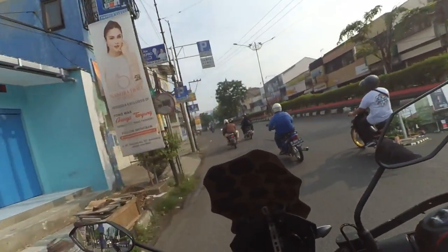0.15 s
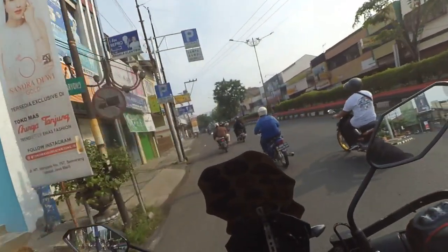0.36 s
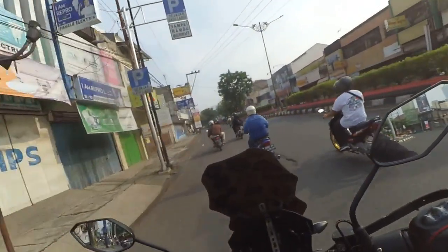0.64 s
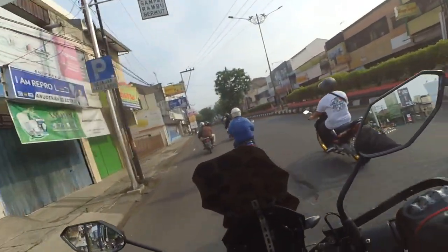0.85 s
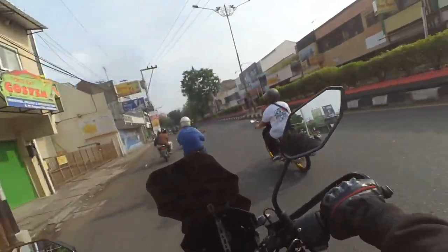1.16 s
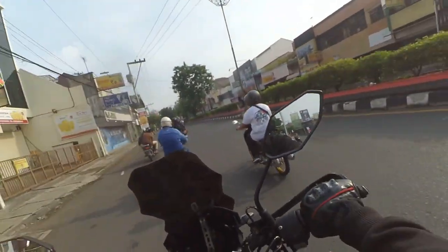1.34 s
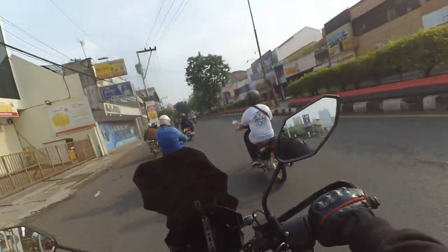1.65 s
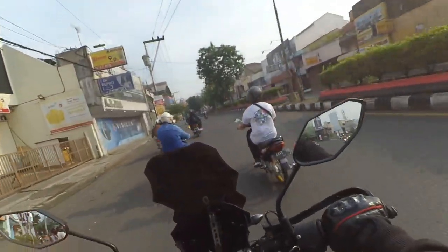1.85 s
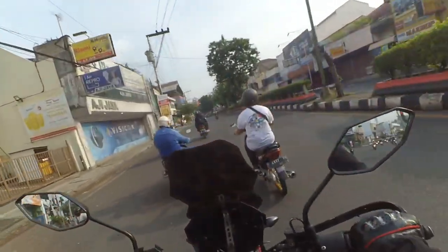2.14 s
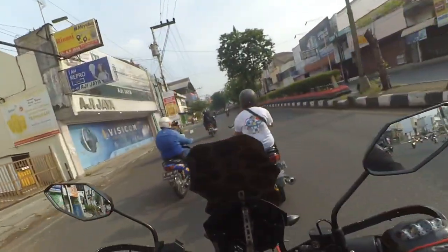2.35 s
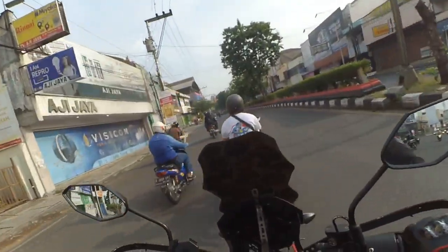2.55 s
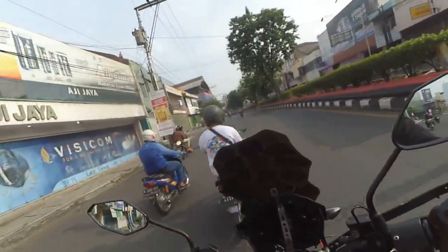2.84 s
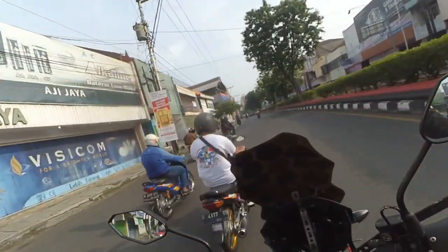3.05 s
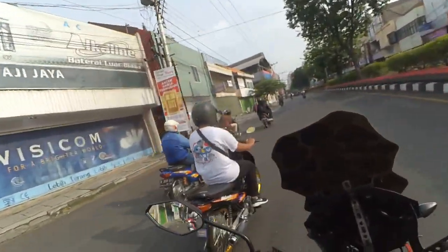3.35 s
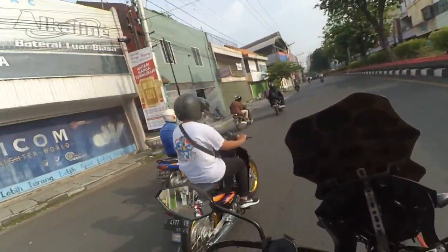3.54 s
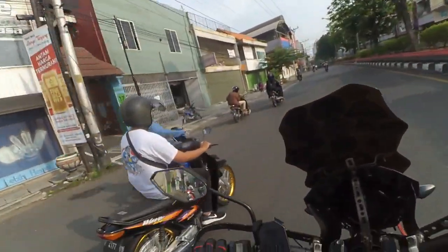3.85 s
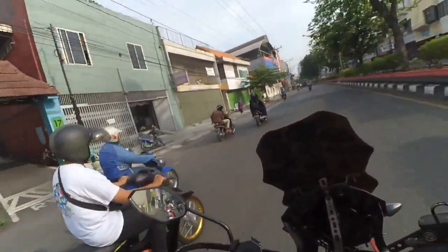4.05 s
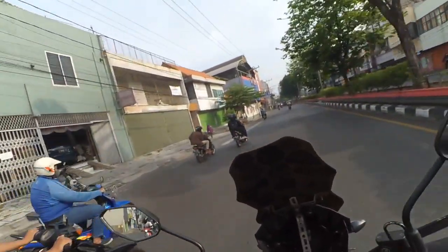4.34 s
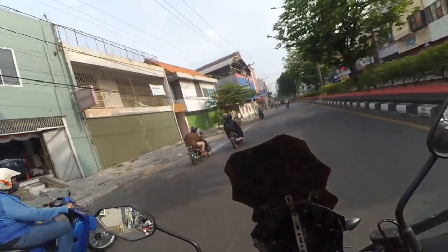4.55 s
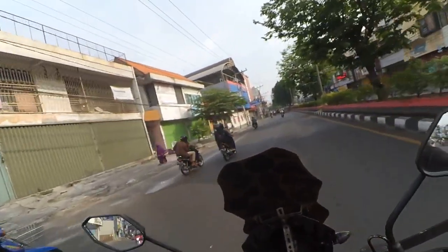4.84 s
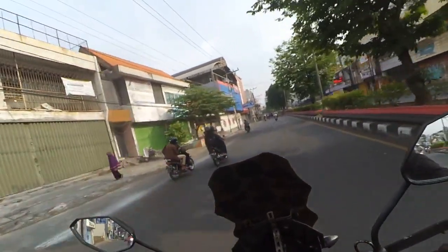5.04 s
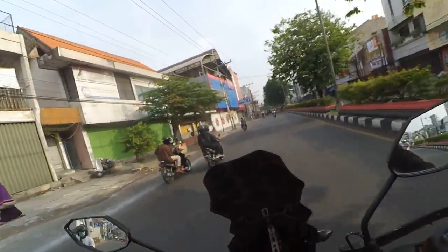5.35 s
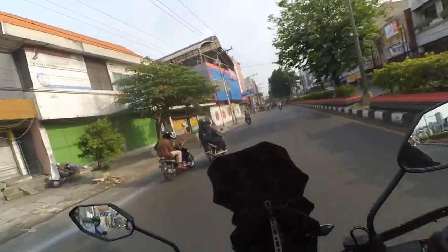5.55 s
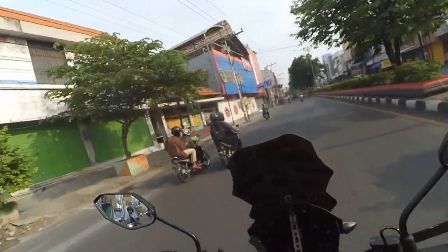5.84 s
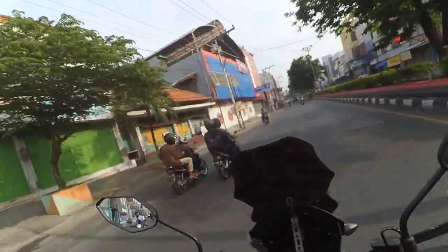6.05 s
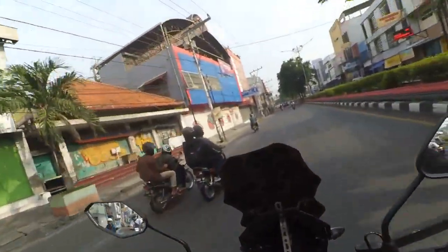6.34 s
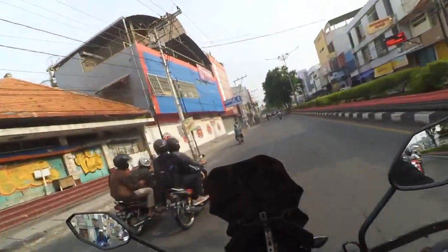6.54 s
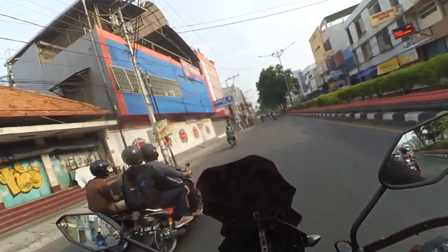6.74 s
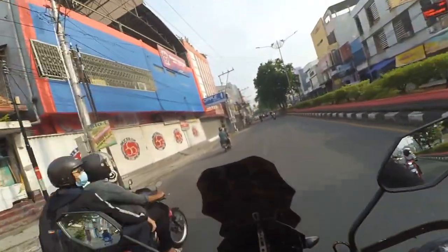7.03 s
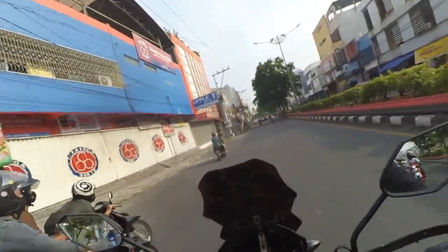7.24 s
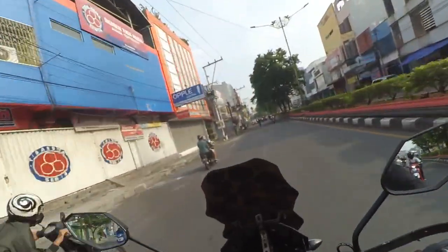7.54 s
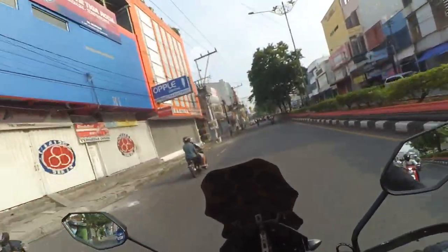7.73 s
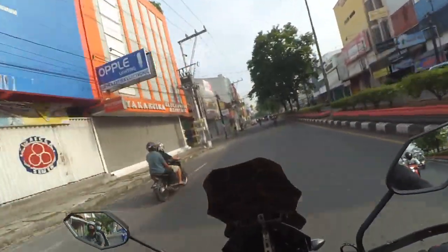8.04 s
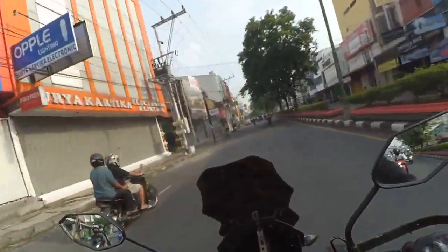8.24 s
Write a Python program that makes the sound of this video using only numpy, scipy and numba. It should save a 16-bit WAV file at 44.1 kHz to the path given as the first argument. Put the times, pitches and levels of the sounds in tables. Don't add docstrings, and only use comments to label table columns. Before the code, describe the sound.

From a rider's helmet on a town street, a single-cylinder motorcycle starts as a quiet low throb beside a slower, ticking moped, with thin traffic hiss fading behind. The throttle opens and the engine climbs smoothly without a gear change. The moped whirrs past around four seconds, wind thumps grow, tyres roar, and a second moped crackles by near the end.

```python
import sys
import numpy as np
from scipy import signal
from scipy.io import wavfile
from scipy.ndimage import uniform_filter1d
from numba import njit

SR = 44100
rng = np.random.default_rng(int(sys.argv[2]) if len(sys.argv) > 2 else 0)


def to_linear_factor(level_db):
    exponent = np.asarray(level_db, float) / 20
    return 10 ** exponent


def master(y):
    cut = np.clip(np.atleast_2d(y).T, -1, 1)
    pcm = np.round(cut * 32767)
    wavfile.write(sys.argv[1], SR, pcm.astype(np.int16))


N = 369999
TIME = np.arange(N) / SR


def curves(table):
    s, *columns = np.transpose(table)
    return [np.interp(TIME, s, c) for c in columns]


def bump(centre_s, span_s):
    return np.exp(-((TIME - centre_s) / span_s) ** 2)


def unit(x):
    return x / np.sqrt(np.mean(x ** 2))


def noise():
    return rng.standard_normal(N)


@njit
def svf(x, hz, width):
    y, band, low = np.empty(len(x)), 0., 0.
    g, k = np.tan(np.pi * hz / SR), width / hz
    for i in range(len(x)):
        v = (band + g * (x[i] - low)) / (1 + g * (g + k))
        band = 2 * v - band
        low += 2 * g * v
        y[i] = k * v
    return y


def steep(x, hz, width):
    return svf(svf(x, 1. * hz, 1. * width), 1. * hz, 1. * width)


def ring(x, modes):
    return sum(to_linear_factor(db) * svf(x, 1. * hz, 1. * width) for hz, width, db in modes)


def walk(rate):
    hold = int(SR / rate)
    steps = np.repeat(rng.standard_normal(N // hold + 1), hold)
    return 1.3 * uniform_filter1d(uniform_filter1d(steps, hold), hold)[:N]


def airy(modes, flicker_db):
    return unit(sum(to_linear_factor(db + flicker_db * walk(15)) * unit(steep(noise(), hz, width))
                    for hz, width, db in modes))


def firings(hz, jitter_ms, scatter_db, start=0.):
    cycles = np.cumsum(hz) / SR + start
    chance = rng.standard_normal((600, 2))
    at = np.flatnonzero(np.diff(np.floor(cycles)))
    late = (jitter_ms * chance[:len(at), 0] * SR / 1000).astype(int)
    size = to_linear_factor(scatter_db * chance[:, 1])
    pulses = np.zeros(N)
    pulses[np.clip(at + late, 0, N - 1)] = size[:len(at)]
    return pulses, cycles, size[cycles.astype(int)]


def puff(cycles, delay, length, rest):
    phase = (cycles - delay) % 1
    return rest + np.exp(-phase / length) * (1 - np.exp(-phase / 0.13))


def soften(pulses, ms):
    return np.convolve(pulses, np.hanning(int(SR * ms / 1000)))[:N]


# t/s, firing rate f/Hz
FIRING = [(0, 28.247), (.7, 29.148), (1.4, 30.884), (2.25, 32.593), (2.4, 33.219), (3, 35.638),
          (3.6, 38.54), (4.2, 40.931), (5.2, 45.513), (6, 48.637), (6.8, 51.838), (7.6, 55.09),
          (8.39, 58.107)]
# t/s, level/dB
THROTTLE = [(0, -45), (.5, -45.5), (1.1, -42.5), (1.3, -46), (1.47, -40), (1.95, -38), (2.2, -41.5),
            (2.35, -35.5), (3, -33.5), (3.6, -32.5), (4.4, -32.5), (5.27, -32.5), (6, -30.5), (6.8, -29.5),
            (7.4, -30), (8, -28), (8.39, -28.5)]


def law(db, per_throttle, per_octave):
    mid_hz, mid_throttle_db = 40, -33
    throttle = curves(THROTTLE)[0] - mid_throttle_db
    octaves = np.log2(curves(FIRING)[0] / mid_hz)
    return db + per_throttle * throttle + per_octave * octaves


# level/dB at mid speed and throttle, slope/(dB per dB of throttle), slope/(dB per octave of speed)
ROAD_LAW = (-39, 0.15, 4.2)
# f/Hz, level/(dB per Hz)
ROAD = [(29, -30), (50, -14), (81, -3.5), (156, 0.5), (217, -11.5), (292, -5.5), (394, -14), (441, -11.5),
        (1020, -18), (1500, -28), (1950, -63), (3300, -120)]


def road():
    hz, db = np.transpose(ROAD)
    swell = walk(1.16)
    bands = 0
    for f in 50 * 2 ** np.arange(0, 5, 1 / 3):
        band_db = np.interp(np.log(f), np.log(hz), db) + 0.15 * swell + 0.99 * walk(7.1)
        bands = bands + to_linear_factor(band_db) * steep(noise(), f, f / 3)
    overtaking_db = 2.5 * bump(4.07, span_s=1)
    return to_linear_factor(law(*ROAD_LAW) + overtaking_db) * unit(bands)


def traffic_behind():
    level_db, gone_s = -73.5, 1.7
    hiss = airy([(4080, 1800, 0)], flicker_db=-2.0)
    return to_linear_factor(level_db) * hiss / (1 + np.exp((TIME - gone_s) / .1))


WIND_LAW = (-40, .1, 9.1)
# t/s, peak level/dB, fall/s
GUSTS = [(.62, -35, 0.17), (.92, -36, 0.069), (1.03, -37, 0.036), (1.46, -36, 0.36), (1.87, -37, 0.25),
         (2.31, -26.5, 0.051), (2.52, -28, 0.025), (3.12, -39, .05), (3.23, -26.5, .04), (3.36, -31, 0.034),
         (3.46, -24.5, 0.071), (3.73, -34, 0.07), (3.99, -27, 0.033), (4.27, -41, .08), (4.6, -25, 0.045),
         (4.72, -30, 0.028), (4.88, -29.5, .2), (5.23, -24, 0.11), (5.48, -26, .2), (5.93, -29, 0.19),
         (6.2, -28.5, 0.12), (6.41, -25, 0.055), (6.54, -36, 0.032), (6.73, -22.5, 0.057),
         (6.95, -28.5, .12), (7.31, -21.5, 0.077), (7.55, -28, 0.23), (7.96, -22.5, 0.08),
         (8.33, -25, 0.19), (8.08, -20, 0.025)]


def wind():
    eddies = svf(noise(), 20.0, 17.2) + to_linear_factor(-12.0) * svf(noise(), 80.0, 83.0)
    even = eddies / np.sqrt(uniform_filter1d(eddies ** 2, SR // 10))
    rise_share = 0.38
    strength = to_linear_factor(law(*WIND_LAW))
    for s, db, fall in GUSTS:
        since = (TIME - s) / fall
        strength = strength + to_linear_factor(db) * np.exp(-np.maximum(since, -since / rise_share))
    return svf(svf(strength * even, 25.0, 59.0), 39.0, 167.0)


# t/s, half span/s, level/dB
TYRES = [
    (3.55, 0.23, -66),
    (6.65, .35, -60),
]


def tyres():
    swells = sum(to_linear_factor(db) * bump(s, span) for s, span, db in TYRES)
    return swells * airy([(6900, 4500, 0)], flicker_db=1.7)


def whirr():
    return to_linear_factor(-47) * bump(3.8, span_s=0.31) * airy([(920, 110, 0)], flicker_db=0.0)


# t/s, firing rate f/Hz
BESIDE_HZ = [(0, 26.849), (.8, 28.267), (1.6, 28.091), (2.2, 27.361), (3.1, 25.446), (5.5, 26)]
# t/s, thud level/dB, tick level/dB, upper ring against lower/dB
BESIDE = [(0, -43.5, -68, 6), (.45, -47.5, -61, -5), (.8, -42, -58.5, -11), (1.6, -44.5, -57, -6),
          (2.05, -45.5, -58, -6), (2.25, -45, -54.5, -2), (2.85, -41.5, -60.5, 0), (3.2, -42, -60, -4),
          (4.5, -82, -85, 1)]


def moped_beside():
    db, tick_db, upper_db = curves(BESIDE)
    pulses, cycles, _ = firings(curves(BESIDE_HZ)[0], jitter_ms=0.3, scatter_db=1.0)
    thuds = unit(ring(soften(pulses, ms=2.75), [(89.0, 18, -11), (140, 37, -6.5), (271, 35, -4.5)]))
    tick_lag, scatter_db, pitch_spread = .174, 4, .04
    ticks, fade = np.zeros(N + 400), np.exp(-np.arange(400) / (SR * .0011))
    at = np.flatnonzero(np.diff(np.floor(cycles - tick_lag)))
    for i, grit in zip(at, rng.standard_normal((len(at), 402))):
        low_hz, high_hz = np.array([9050., 12200.]) * (1 + pitch_spread * grit[-2:])
        strike = grit[2:] * fade
        lower = steep(strike, low_hz, 1300.)
        upper = steep(strike, high_hz, 1400.)
        lower_gain, upper_gain = to_linear_factor(tick_db[i] + scatter_db * grit[:2] + [0, upper_db[i]])
        ticks[i:i + 400] += lower_gain * lower / np.abs(lower).max()
        ticks[i:i + 400] += upper_gain * upper / np.abs(upper).max()
    return to_linear_factor(db) * thuds + ticks[:N]


# t/s, firing rate f/Hz, level/dB
AHEAD = [(5, 46.4, -86), (5.8, 47.38, -70), (6.3, 47.28, -67), (6.8, 50.13, -64.5), (7.3, 51.4, -64),
         (7.9, 54.86, -72), (8.39, 59.7, -77)]


def moped_ahead():
    hz, db = curves(AHEAD)
    pulses, cycles, size = firings(hz, jitter_ms=0.13, scatter_db=1.5)
    puffs = unit(svf(noise(), 8000.0, 2300.0) * size * puff(cycles, delay=0, length=0.072, rest=0.037))
    cracks = unit(svf(soften(pulses, ms=0.83), 810.0, 570.0))
    return to_linear_factor(db) * (puffs + to_linear_factor(18) * cracks)


# t/s, half span/s, level/dB
FRONTS = [(3.05, 0.36, 1), (3.75, 0.92, 1.5), (5.1, 0.49, 4), (6.6, 0.31, -1), (8.1, 0.62, 1)]


def fronts_db():
    return sum(db * bump(s, span) for s, span, db in FRONTS)


CRANK_LAW = (-39, 0.64, 1.1)


def crank(cycles, hz):
    frame_hz, frame_width_hz, frame_db = 91, 15, 6
    db = law(*CRANK_LAW) + frame_db / (1 + ((2 * hz - frame_hz) / frame_width_hz) ** 2)
    twice = np.cos(4 * np.pi * (cycles - .05))
    once = to_linear_factor(-6.0 + 4.6 * walk(19)) * np.sin(2 * np.pi * cycles)
    return np.sqrt(2) * to_linear_factor(db) * (twice - once)


# delay/ms, share
RETURNS = [(2.55, 0.98), (5.1, -0.7), (7.7, 0.51), (10.2, 0.035), (12.8, -0.016)]


def echoed(x, hz):
    haste, strength = (hz / 42) ** -.22, (hz / 50) ** 0.47
    returns = sum(share * np.interp(TIME - ms * haste / 1000, TIME, x) for ms, share in RETURNS)
    return x + strength * returns


# f/Hz, width/Hz, level/dB
PIPE = [(149, 114, -4.5), (325.4, 77, 10.5), (437, 114, -8.5), (490, 125, 1.5)]
# f/Hz, width/Hz, level/dB
AIRBOX = [(106.2, 31, 4), (155.4, 29, 4)]
AIRBOX_LAW = (-49, .1, -16)


def exhaust(pulses, cycles, hz):
    push = np.roll(soften(pulses, ms=1.68), 24)
    blows = echoed(ring(push, PIPE), hz)
    climb = np.clip((hz - 38) / 20, 0, 1)
    swallowed = (1 - climb) * svf(blows, 235., 95.) + climb * svf(blows, 274., 62.)
    blows = unit(blows - 0.62 * swallowed)
    rough = unit(ring(noise() * puff(cycles, delay=0, length=0.68, rest=1.0), PIPE[1:]))
    intake = unit(ring(ring(push, AIRBOX), AIRBOX))
    pipe = to_linear_factor(curves(THROTTLE)[0]) * (to_linear_factor(-1.5) * blows + to_linear_factor(-16) * rough)
    return pipe + to_linear_factor(law(*AIRBOX_LAW)) * intake


# f/Hz, width/Hz, level/dB
GAS = [(640, 250, 2), (907, 280, 4), (1296, 210, 0.5), (1550, 510, -5.5), (1910, 150, -9.5)]
GAS_LAW = (-50, 0.8, 12.9)
# f/Hz, width/Hz, level/dB
BARK = [(651, 54, 14), (865, 66, 10), (1040, 52, 4.5), (1224, 82, 5.5)]
# f/Hz, width/Hz, level/dB
CRACK = [(1450, 160, -18), (1917, 200, 24.5), (2780, 1900, 12.5)]
CRACK_LAW = (-15.5, 0, -17)


def roar(pulses, cycles, size, hz):
    gas = unit(airy(GAS, flicker_db=3.5) * size * puff(cycles, delay=0.37, length=.22, rest=1.0))
    bark = unit(echoed(ring(np.roll(soften(pulses, ms=0.6), 40), BARK), hz))
    snap = np.roll(soften(pulses * to_linear_factor(3 * walk(40)), ms=0.32), int(SR * 0.0045))
    crack = unit(ring(snap, CRACK))
    crack_db = law(*CRACK_LAW) + 0.83 * fronts_db()
    mix = to_linear_factor(-4.2) * gas + to_linear_factor(0.3) * bark + to_linear_factor(crack_db) * crack
    return to_linear_factor(law(*GAS_LAW) + fronts_db()) * mix


# f/Hz, width/Hz, level/dB
HISS = [(2350, 1200, 3.5), (2727, 150, -2), (2870, 1100, 2.5), (3820, 1250, -4.5), (4900, 2000, -6),
        (5750, 640, -6), (6860, 4600, 5.5), (8060, 3300, -2.5), (11340, 3400, -8), (13600, 3500, -15)]
HISS_LAW = (-59.5, 0.061, 10.7)


def machinery(cycles):
    hiss = unit(airy(HISS, flicker_db=.65) * puff(cycles, delay=0.14, length=0.27, rest=0.78))
    return to_linear_factor(law(*HISS_LAW) + 0.47 * fronts_db()) * hiss


# f/Hz, width/Hz, level/dB
CASING = [(3800, 220, 9), (4290, 130, 7), (4500, 200, -3)]
WHINE_LAW = (-76.5, .1, 8)


def gears(cycles):
    waver = .11 * np.cumsum(noise())
    whine = to_linear_factor(2.5 * walk(9) + 1.5) * np.sin(2 * np.pi * 84.2 * cycles + waver)
    return to_linear_factor(law(*WHINE_LAW)) * ring(whine, CASING)


def engine():
    hz = curves(FIRING)[0]
    pulses, cycles, size = firings(hz, jitter_ms=0.024, scatter_db=0.3, start=0.935)
    pulses = pulses / np.sqrt(hz)
    body = crank(cycles, hz) + exhaust(pulses, cycles, hz)
    return body + roar(pulses, cycles, size, hz) + machinery(cycles) + gears(cycles)


def scene():
    street = road() + traffic_behind() + wind() + tyres() + whirr()
    mono = street + moped_beside() + moped_ahead() + engine()
    side = to_linear_factor(-66) * unit(svf(noise(), 25., 18.0))
    return np.array([mono + side, mono - side])


def roll_off(x):
    return signal.sosfilt(signal.butter(12, 15210, fs=SR, output="sos"), x)


def record(dry):
    low_pass = signal.ellip(8, .2, 60, 15250, fs=SR, output="sos")
    cut = signal.sosfilt(low_pass, dry)
    return roll_off(cut)


dry = scene()
out = record(dry)
master(out)
```